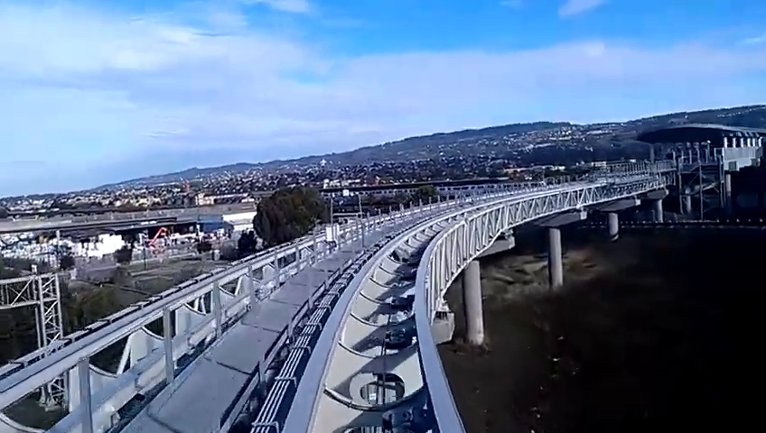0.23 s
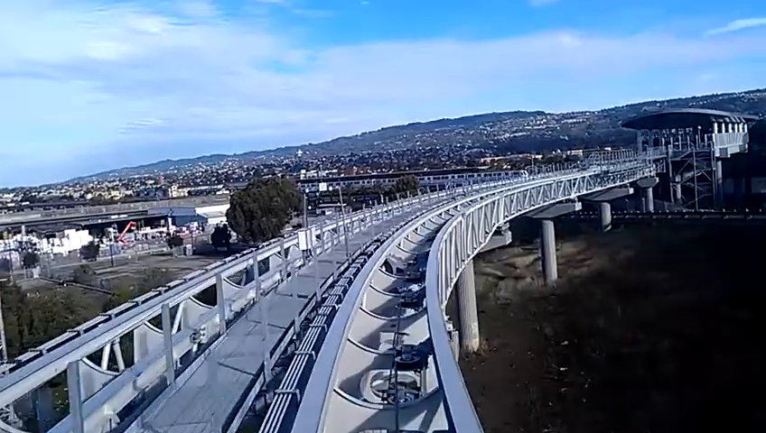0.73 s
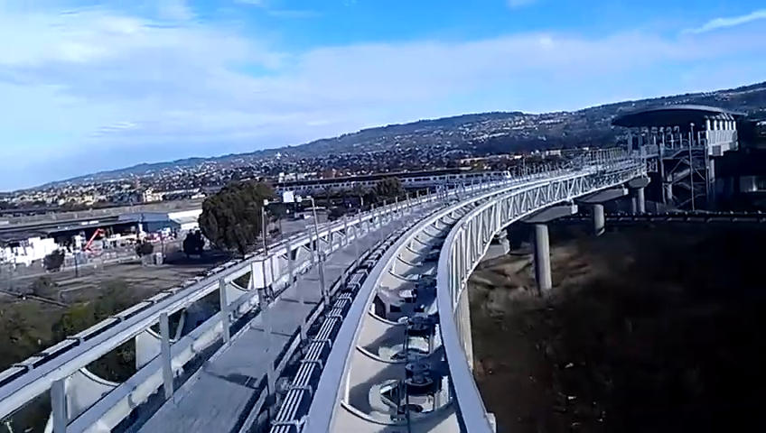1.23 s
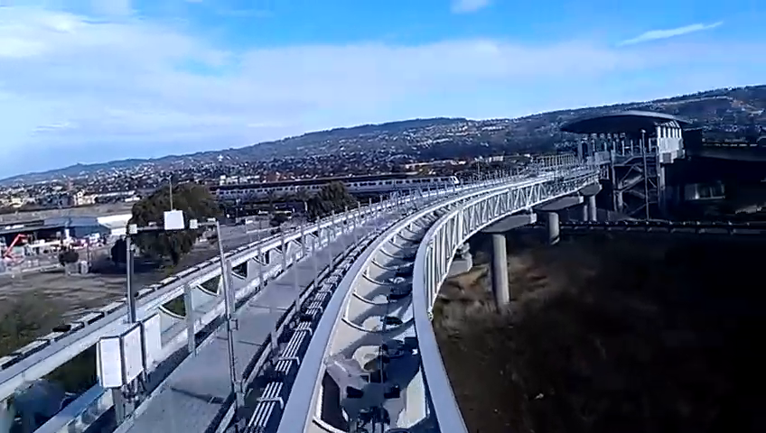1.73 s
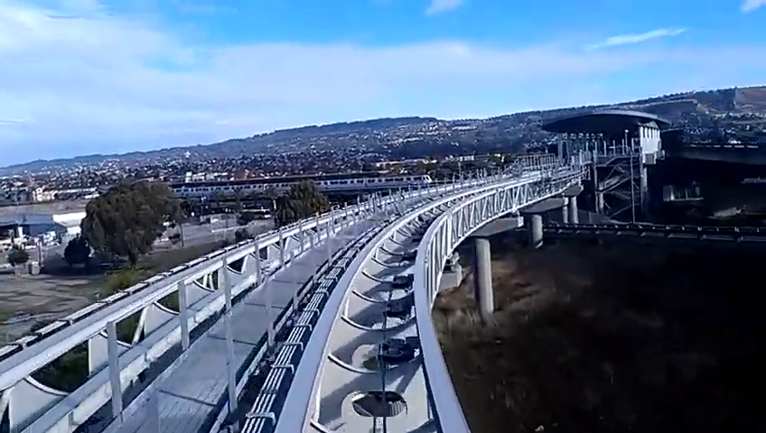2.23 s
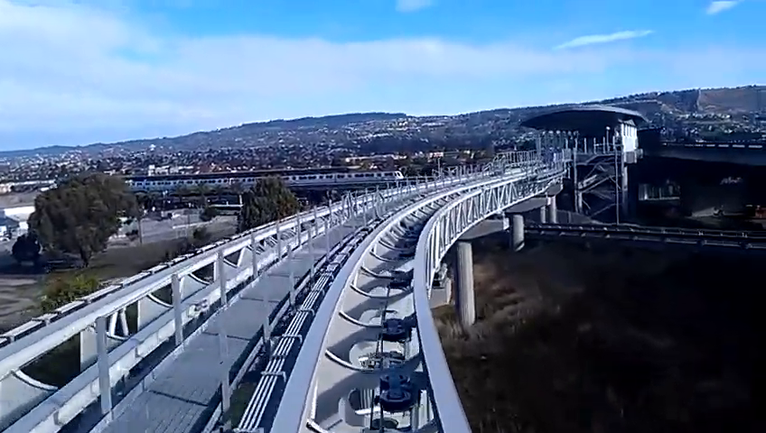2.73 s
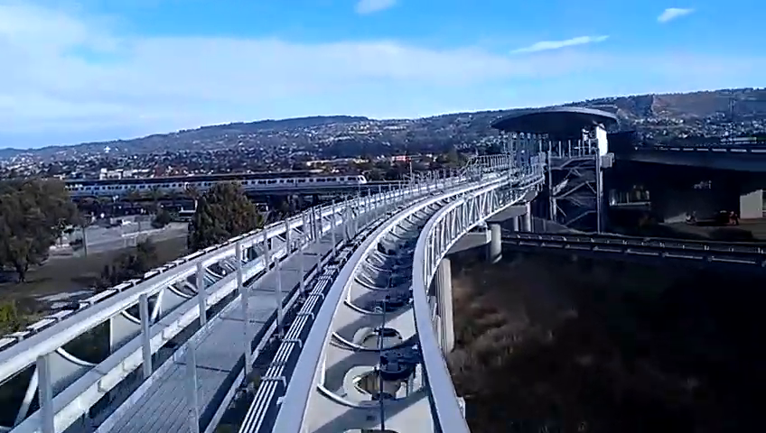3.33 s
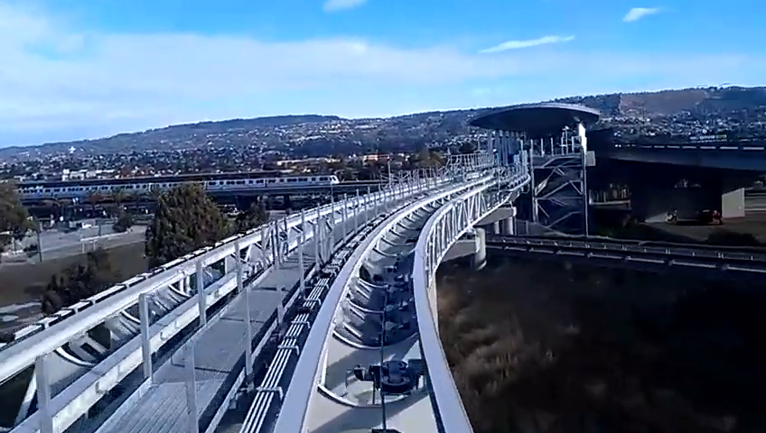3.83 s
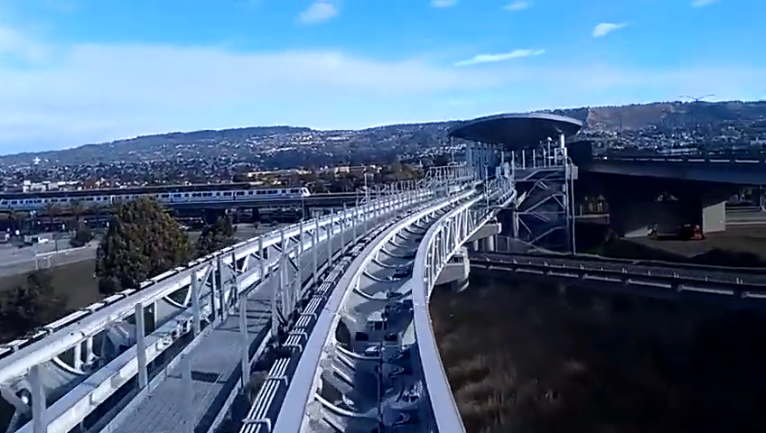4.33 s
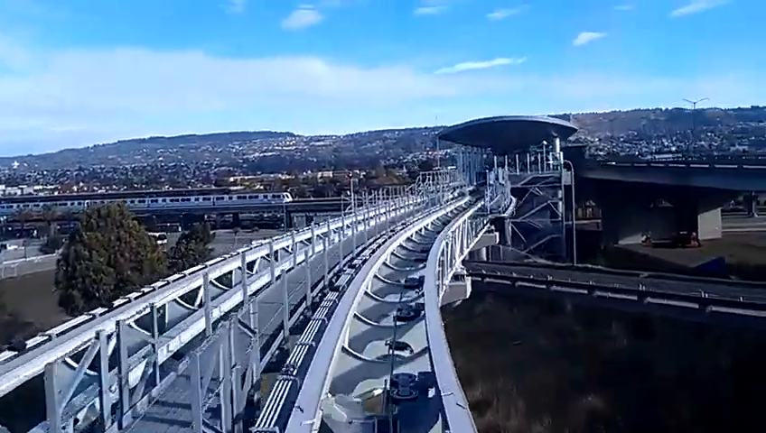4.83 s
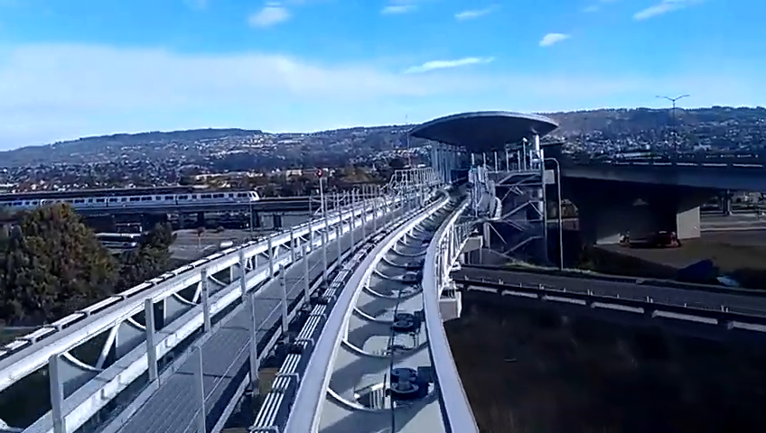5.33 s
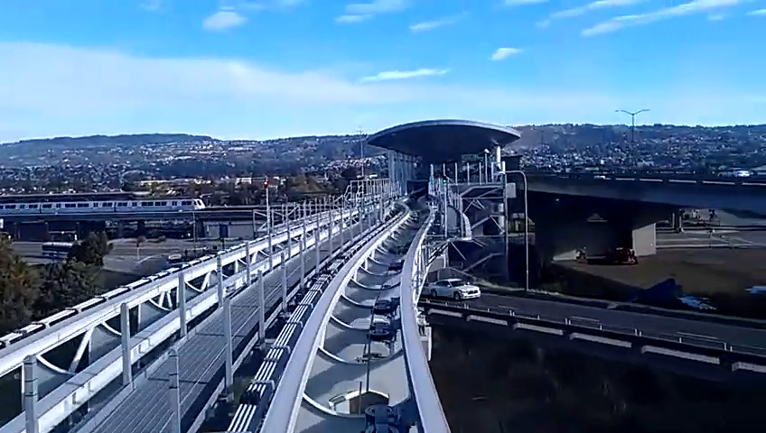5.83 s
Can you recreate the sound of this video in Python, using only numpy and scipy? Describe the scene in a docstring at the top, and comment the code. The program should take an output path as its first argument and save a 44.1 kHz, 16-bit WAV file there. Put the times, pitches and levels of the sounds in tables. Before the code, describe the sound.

Inside a driverless train car, steady tyre roar and airy rush continue while a gear whine slowly sinks and a loose fitting clacks occasionally.

```python
"""Tyre roar and a rush of air fill a driverless train car that eases off along an elevated guideway.
A whine from the running gear slowly sinks, a loose fitting clacks, and a ventilation unit hums.
The roar and rush are shaped noise; whine and hum are tones with wavering strength and phase.
The clacks are bursts of random impulses and noise that excite resonant modes, each with a noise tail.
An output stage widens the stereo image, limits the highest peaks and cuts the top of the treble."""
import sys
import numpy as np
from scipy import signal
from scipy.fft import rfft, irfft
from scipy.io import wavfile
from scipy.ndimage import uniform_filter1d, minimum_filter1d

SR = 44100
rng = np.random.default_rng(int(sys.argv[2]) if len(sys.argv) > 2 else 0)


def store_pcm(level_fs):
    """Save levels as 16-bit WAV."""
    pcm = np.round(np.clip(level_fs, -1, 1) * 32767).astype(np.int16)
    wavfile.write(sys.argv[1], SR, np.atleast_2d(pcm).T)


N = 267775
TIME, HZ = np.arange(N) / SR, np.fft.rfftfreq(N, 1 / SR)  # seconds, Hz


def gain_of(db):
    """Level law: decibels to an amplitude ratio."""
    return 10 ** (np.asarray(db) / 20)


def evened(x):
    """Power normalisation: scales to rms 1."""
    return x / np.sqrt(np.mean(np.abs(x) ** 2) + 1e-20)


def read(points, hz):
    """Spectral envelope: interpolates the points on a log-frequency axis."""
    point_hz, value = np.transpose(points)
    return np.interp(np.log(hz + 1), np.log(point_hz + 1), value)


def follow(curve):
    """Time envelope: interpolates each column after the first at every sample."""
    seconds, *columns = np.transpose(curve)
    return np.squeeze([np.interp(TIME, seconds, column) for column in columns])


def panned(lean_db):
    """Level-difference stereo: left and right gains whose mean is 1, for left minus right in dB."""
    ratio = gain_of(np.atleast_1d(lean_db))
    return 2 * np.array([ratio, np.ones_like(ratio)]) / (1 + ratio)


def drift(rate_hz):
    """Low-pass noise: a random modulation of rms 1 with a Gaussian roll-off around the given rate."""
    spectrum = rfft(rng.standard_normal(N))
    return evened(irfft(spectrum * np.exp(-(HZ / rate_hz) ** 2), N))


def fuzzy_tone(hz, width_hz, steady):
    """Narrow-band noise around a carrier; steady is the share of power that stays a clean tone."""
    steady = np.clip(steady, 0, 1)
    waver = evened(drift(width_hz / 2) + 1j * drift(width_hz / 2))
    phasor = np.sqrt(steady) + np.sqrt(1 - steady) * waver
    turns = np.cumsum(hz * np.ones(N)) / SR + rng.random()
    return evened((phasor * np.exp(2j * np.pi * turns)).real)


# Spectrum of the tyres' rolling noise.
# Each row: frequency in Hz, relative density in dB per Hz.
TYRE_SPECTRUM = [(90, -81), (150, -54), (200, -35.5), (280, -15.5), (370, -9), (450, -8), (600, -2.5),
                 (820, 0), (1000, -2), (1300, -9.5), (2000, -18.5), (4000, -81)]
# Spectrum of the rush of the drive and of air over the body.
# Each row: frequency in Hz, relative density in dB per Hz.
RUSH_SPECTRUM = [(300, -67.5), (900, -8.5), (1350, 8), (2000, 9.5), (2420, 9), (2620, 2.5), (2850, 1),
                 (3400, -1.5), (4200, -0.5), (5200, -6), (6600, -6.5), (7600, -10), (8800, -5.5),
                 (9600, -17), (10150, -28), (10700, -57.5)]
# Level of the tyre roar as the track passes under the car. Each row: time in seconds, level in dB.
TYRE_LEVEL = [(0.0, -18.5), (.13, -21.5), (.29, -16.5), (.34, -23), (.38, -17.5), (.56, -18), (.7, -20),
              (1.23, -18.5), (1.32, -21), (1.53, -18), (1.85, -20), (1.91, -18), (2.12, -18), (2.3, -18.5),
              (2.5, -17), (2.55, -26.5), (2.6, -16), (2.84, -20.5), (2.95, -18.5), (3.25, -17), (3.31, -22),
              (3.37, -19.5), (3.47, -18.5), (3.53, -17), (3.6, -21), (3.73, -18), (3.92, -22),
              (4.01, -15.5), (4.08, -18.5), (4.5, -17.5), (4.6, -17.5), (4.72, -19), (4.97, -19.5),
              (5.02, -17.5), (5.2, -19.5), (5.31, -16.5), (5.39, -21), (5.44, -18.5), (5.8, -18.5),
              (6.07, -16.5)]
# Level of the rush. Each row: time in seconds, level in dB.
RUSH_LEVEL = [(0.0, -21), (0.36, -22.5), (0.8, -21.5), (1.32, -22.5), (1.44, -21.5), (2.36, -21.5),
              (2.47, -22.5), (2.6, -21.5), (3.36, -21.0), (3.64, -22), (3.72, -21), (3.84, -22.5),
              (4.96, -21.5), (5.08, -20), (5.24, -22), (6.07, -20)]


def rolling():
    """Broadband rolling noise: tyres roar with a quick flutter on steel track, under a smoother rush."""
    roar = cabin_noise(TYRE_SPECTRUM, patchy_db=1.5, flutter_db=1.2, flutter_hz=35)
    rush = cabin_noise(RUSH_SPECTRUM, patchy_db=0.94, flutter_db=0.72, flutter_hz=35)
    return roar * gain_of(follow(TYRE_LEVEL)) + rush * gain_of(follow(RUSH_LEVEL))


# Likeness of the cabin noise in the two channels.
# Each row: frequency in Hz, left-right correlation from 0 to 1.
CABIN_LIKENESS = [(200, 0.93), (290, 0.83), (430, 0.62), (600, 0.79), (950, 0.64), (1500, 0.17),
                  (2300, 0.38), (3400, 0.42), (4600, 0.42), (6800, 0.3), (8000, 0.22), (9600, 0.13)]
# Stereo lean of the cabin noise. Each row: frequency in Hz, left minus right in dB.
CABIN_BALANCE = [(200, 7.5), (290, 5), (430, 5.5), (600, 7), (950, 6.5), (1500, 6.5), (2300, 7.5),
                 (3400, 6.5), (4600, 7.5), (6800, 7.5), (8000, 1.5), (9600, 6)]


def cabin_noise(colour, patchy_db, flutter_db, flutter_hz):
    """Partly coherent filtered noise: drifting spectral patches and a flutter shared by both channels."""
    window, hop = 2048, 512  # samples
    frames, hz = N // hop + 5, np.fft.rfftfreq(window, 1 / SR)
    a, b, c, d, patches = rng.standard_normal((5, frames, len(hz)))
    patches = uniform_filter1d(patches, size=9, axis=0)  # smooth in time
    patches = evened(uniform_filter1d(patches, size=28, axis=1))  # smooth in frequency
    same = np.clip(read(CABIN_LIKENESS, hz), -1, 1)
    left, other = a + 1j * b, c + 1j * d
    right = same * left + np.sqrt(1 - same ** 2) * other
    lean = panned(read(CABIN_BALANCE, hz))[:, None]
    spectra = np.array([left, right]) * lean * gain_of(read(colour, hz) + patchy_db * patches)
    noise = signal.istft(spectra.swapaxes(1, 2), nperseg=window, noverlap=window - hop)[1][:, :N]
    noise = noise * gain_of(flutter_db * drift(flutter_hz))
    return noise / np.std(noise.mean(0))


# The running gear slows as the car brakes.
# Each row: time in seconds, turning rate in Hz before a small waver, level of its third multiple in dB,
# level of its fourth multiple in dB.
GEAR_SLOWING = [(0, 255, -24, -40), (.45, 252.5, -26, -42), (.8, 245.6, -38, -29), (1.6, 242, -33, -27),
                (2.4, 236.5, -32, -27.5), (3.1, 231.5, -29, -31.5), (3.5, 227.5, -43, -29.5),
                (4.2, 221, -35, -29), (4.8, 215.5, -36, -24.5), (5.4, 205, -41, -33),
                (6.07, 197.4, -41, -36)]


def whine(waver=0.00486, fade_db=2, fade_hz=10):
    """Harmonics of rotation: two multiples of the turning rate sink with speed, wavering and fading."""
    turning_hz, third_db, fourth_db = follow(GEAR_SLOWING)
    turning_hz = turning_hz * (1 + waver * drift(rate_hz=8.22))  # waver is an rms fraction
    third = gain_of(third_db) * fuzzy_tone(3 * turning_hz, width_hz=25, steady=0.24)
    fourth = gain_of(fourth_db) * fuzzy_tone(4 * turning_hz, width_hz=25, steady=0.33)
    fade = evened(gain_of(fade_db * drift(fade_hz)))
    return panned(lean_db=3.5) * (third + fourth) * fade


# Clacks of a loose fitting.
# Each row: start in seconds, relative level in dB, rise time constant in seconds,
# length of the chatter in seconds (to 1/e), time for the tail to fall 60 dB in seconds,
# brightness tilt in dB per octave.
CLACK_EVENTS = [(1.310, -21.5, 0.0055, 0.016, .17, 1), (1.755, -16.5, 0.0068, 0.017, .2, -1),
                (1.794, -27, 0.0043, 0.013, .14, -5), (2.7, -29, .012, .02, .22, 1),
                (3.698, -20, .004, 0.0087, 0.075, 0), (3.705, -14, 0.0023, 0.021, 0.35, -.5),
                (3.726, -16, .002, 0.0078, 0.089, 3), (4.254, -29, 0.0045, 0.0087, 0.073, 3),
                (6.058, -23.5, .003, 0.013, 0.14, -4.5)]
# Resonant modes of the fitting. Each row: frequency in Hz, lift in dB, width in Hz.
FITTING_MODES = [(4640, 1.5, 120), (6000, 6, 66), (6610, 4.5, 160), (7100, 3.5, 40), (8400, 4, 120)]
# Colour of every clack. Each row: frequency in Hz, relative density in dB per Hz.
CLACK_SPECTRUM = [(500, -43), (2500, -19), (4100, 1), (5600, 2), (6700, 3), (7600, 2), (8700, 2.5),
                  (10000, -3), (11300, -20)]
CONTACTS_PER_S = 2100  # mean rate of tiny hard contacts within the chatter
TAIL_TOP_HZ = 9800  # the cabin soaks up the ring of a clack above this


def clacks(tail_db=1.5, scrape_db=-2, clump_db=0.9, bend_hz=6500):
    """Impact excitation of modes: ragged chatter rings the fitting, with a bright decaying cabin tail."""
    spectrum = 0
    tail_lowpass = 1 / (1 + (HZ / TAIL_TOP_HZ) ** 20)
    octaves = np.log2(np.maximum(HZ / bend_hz, .5))  # the tilt stops one octave below the bend
    for start, db, rise, length, t60, brightness in CLACK_EVENTS:
        age = np.maximum(TIME - start, 0)
        onset = 1 - np.exp(-age / rise)  # silent before the start
        struck = rng.random(N) < CONTACTS_PER_S / SR
        contacts = evened(struck * rng.choice([-1., 1.], (2, N)))
        scrape = gain_of(scrape_db) * rng.standard_normal((2, N))
        chatter = evened(contacts + scrape) * np.exp(-(age / length) ** 2)
        tail = rng.standard_normal((2, N)) * gain_of(tail_db - 60 * age / t60)
        clack = rfft(onset * chatter) + rfft(onset * tail) * tail_lowpass
        spectrum = spectrum + clack * gain_of(db + brightness * octaves)
    modes = 1 + sum((gain_of(lift) - 1) / (1 + 2j * (HZ - hz) / width)
                    for hz, lift, width in FITTING_MODES)
    response = evened(modes * gain_of(read(CLACK_SPECTRUM, HZ)))
    rung = irfft(spectrum * response, N)
    clumps = gain_of(clump_db * drift(rate_hz=200))  # the contacts come in uneven clumps
    return panned(lean_db=5.5) * rung * clumps


FAN_HZ = 165.4  # base rate of the ventilation unit
# Tones of the ventilation unit.
# Each row: multiple of FAN_HZ (rounded to a whole number when played), level in dB, width in Hz,
# left minus right in dB.
FAN_TONES = [(2.99, -36.5, 18, 11.5), (3.982, -28, 20, 4.5), (4.99, -29, 21, 10), (10.1, -38, 15, -3),
             (12, -41, 24, 6.5), (14, -37, 30, 5)]
# Resonances of the car body, kept ringing by the ride.
# Each row: frequency in Hz, level in dB, width in Hz, left minus right in dB.
BODY_TONES = [(293.3, -51, 11, 3.5), (588.6, -34, 21, 5), (740, -33.5, 38, 4), (807, -32.5, 31, 9),
              (984, -40, 12, 5), (1070, -40, 13, 7), (1170, -36, 64, 7), (1218, -37, 22, 5),
              (2405, -46, 40, 8)]
BOOM_HZ = 411  # a body resonance far to the left
# Level of that boom. Each row: time in seconds, level in dB.
BOOM_SWELL = [(0, -31), (.5, -35), (2.5, -37.5), (3.3, -32.5), (4.2, -33), (6.07, -30.5)]


def hum(swell_db=2.5, swell_hz=1.8):
    """Fan harmonics and body resonances: each holds its pitch while its strength comes and goes."""
    fan = body = 0
    for multiple, db, width, lean in FAN_TONES:
        tone = fuzzy_tone(round(multiple) * FAN_HZ, width, steady=0.03)
        swell = evened(gain_of(swell_db * drift(swell_hz)))
        fan = fan + panned(lean) * gain_of(db) * tone * swell
    for hz, db, width, lean in BODY_TONES:
        body = body + panned(lean) * gain_of(db) * fuzzy_tone(hz, width, steady=0.064)
    boom = gain_of(follow(BOOM_SWELL)) * fuzzy_tone(BOOM_HZ, width_hz=22.8, steady=0.015)
    return fan + body + panned(lean_db=22) * boom


def scene():
    """Superposition: the sound pressures of all sources in the car add."""
    return rolling() + hum() + whine() + clacks()


def limited(x):
    """Peak limiting: a fast gain shared by both channels turns down peaks that would pass full scale."""
    allowed = 1 / np.maximum(np.abs(x).max(0), 1)
    lowest = minimum_filter1d(allowed, size=401)
    return x * uniform_filter1d(lowest, size=401)


WIDEN_S = .01  # delay of the widening echo, seconds
EDGE_HZ = 11300  # upper edge of the output band


def record(dry, side_echo=0.22, mid_echo=0.14):
    """Antiphase echo: a delay of opposite sign in the channels widens; then limiter and band limit."""
    mid, side = dry.mean(0), (dry[0] - dry[1]) / 2
    echo = np.pad(side_echo * side + mid_echo * mid, (round(WIDEN_S * SR), 0))[:N]
    wide = np.array([dry[0] + echo, dry[1] - echo])
    lowpass = signal.firwin(511, EDGE_HZ, window=("kaiser", 9), fs=SR)
    return signal.oaconvolve(limited(wide), lowpass[None], "same")


dry = scene()
out = record(dry)
store_pcm(out)
```